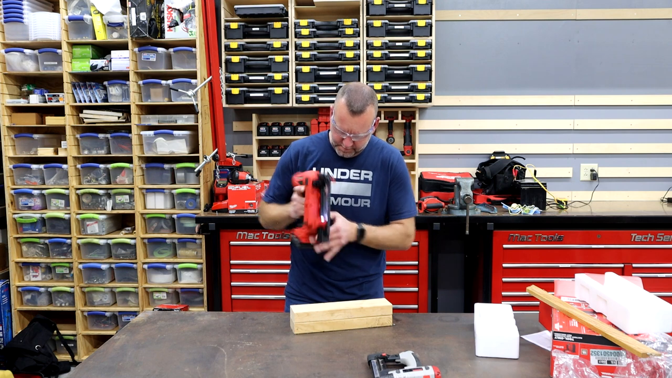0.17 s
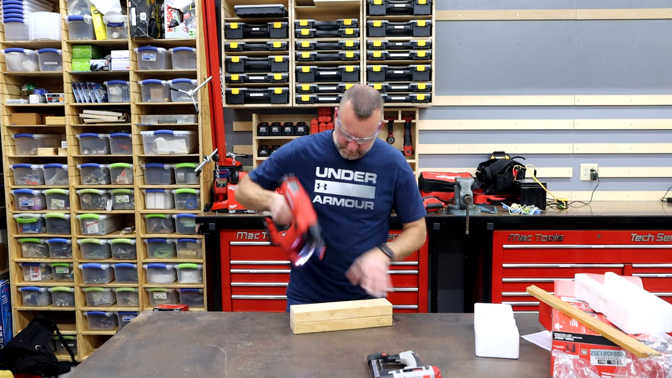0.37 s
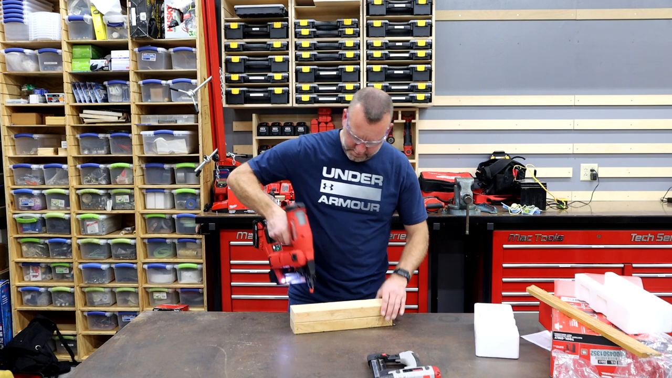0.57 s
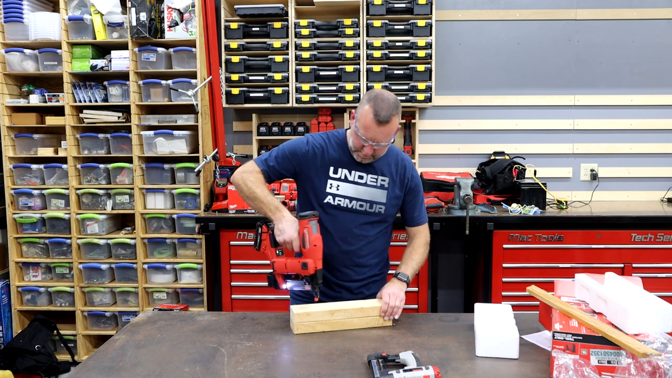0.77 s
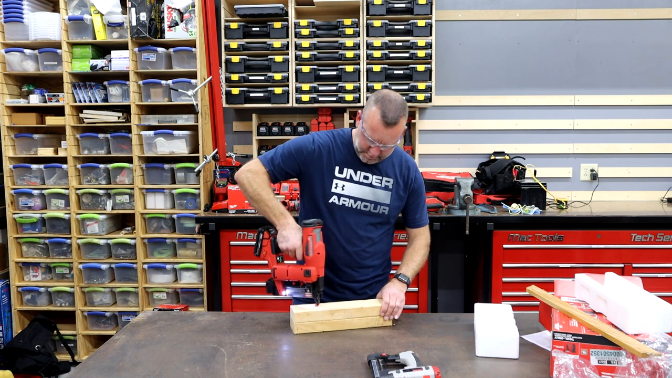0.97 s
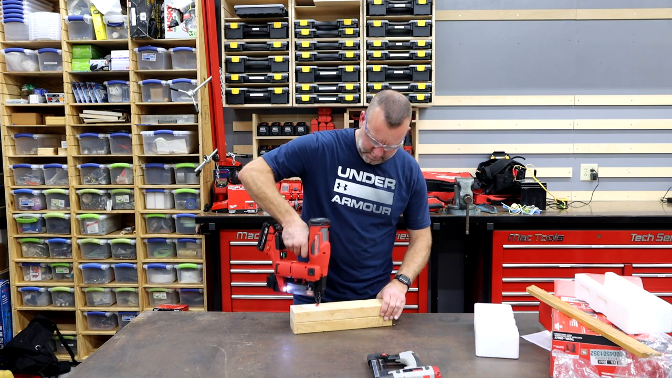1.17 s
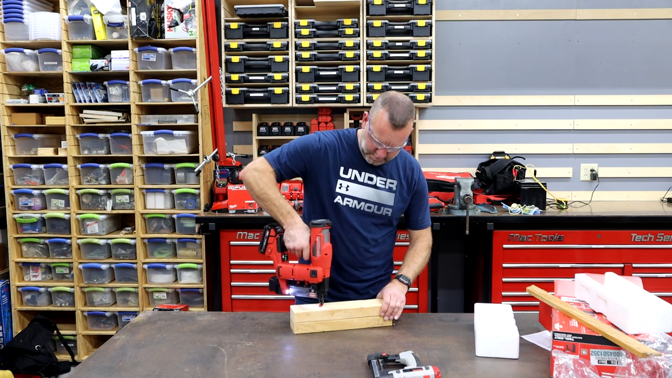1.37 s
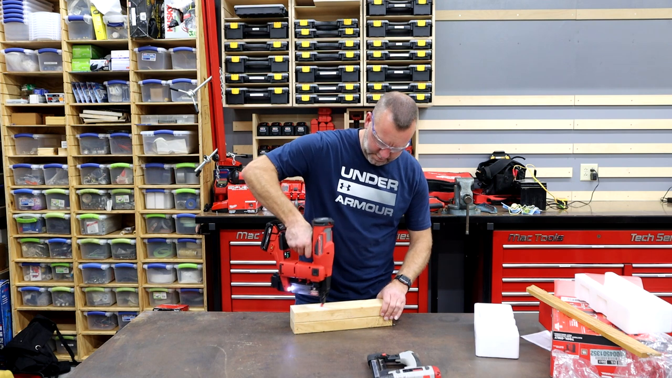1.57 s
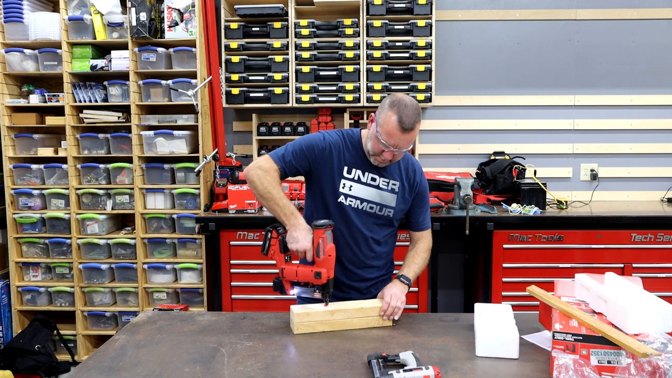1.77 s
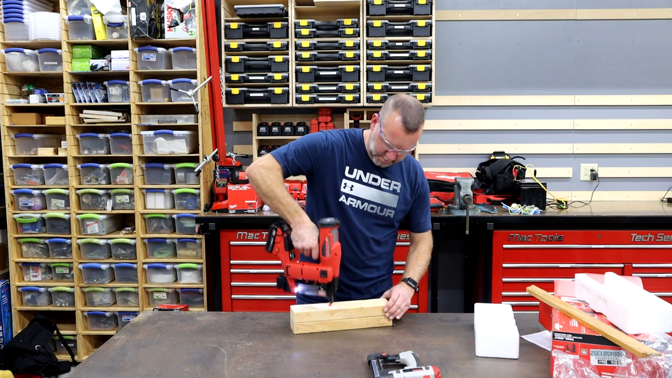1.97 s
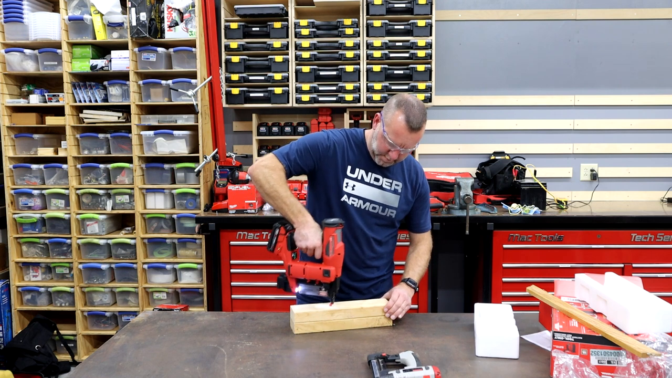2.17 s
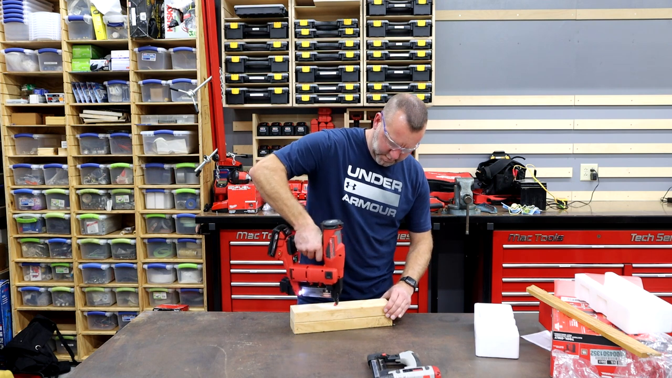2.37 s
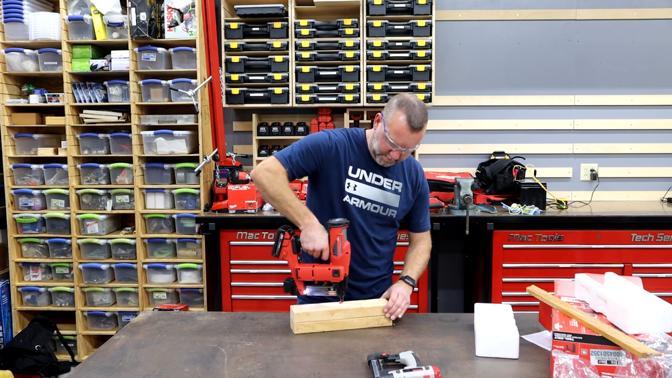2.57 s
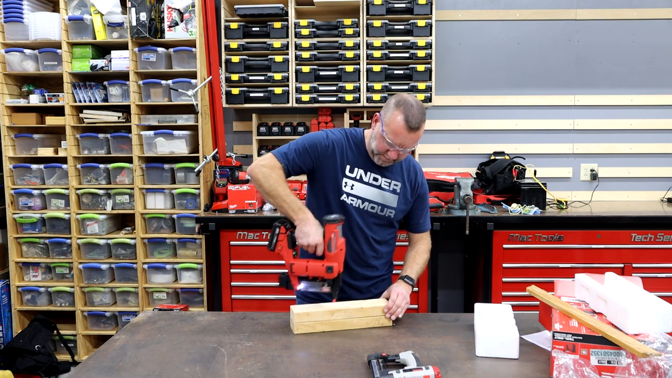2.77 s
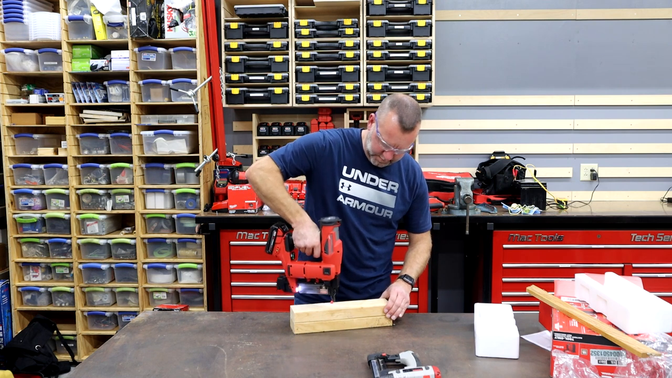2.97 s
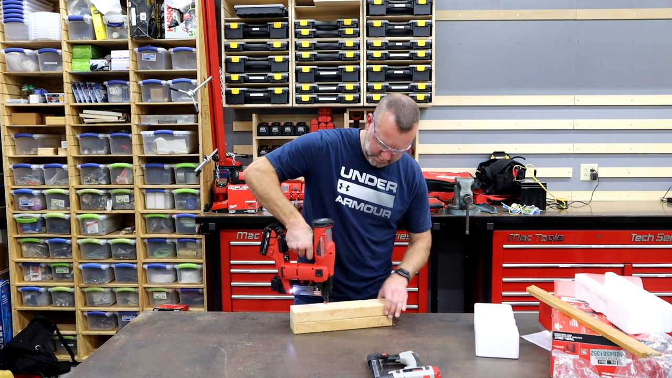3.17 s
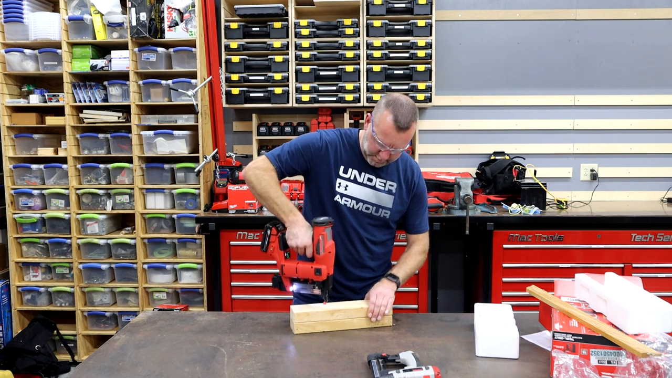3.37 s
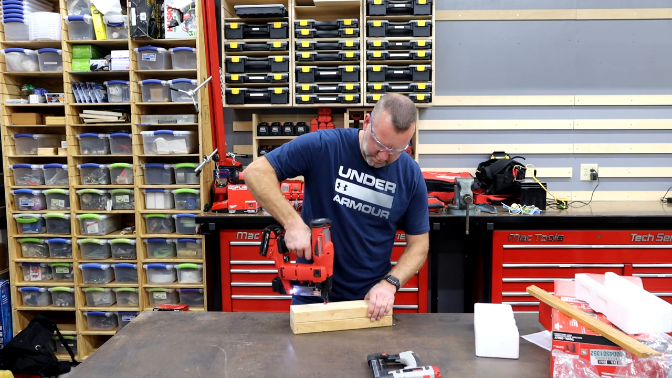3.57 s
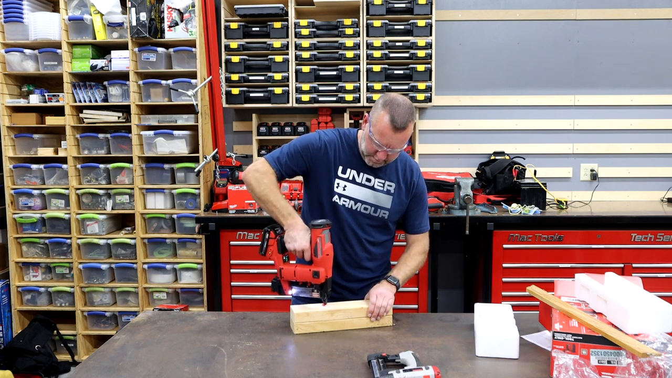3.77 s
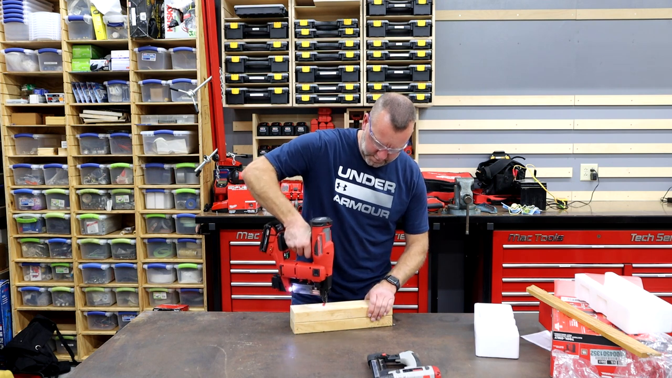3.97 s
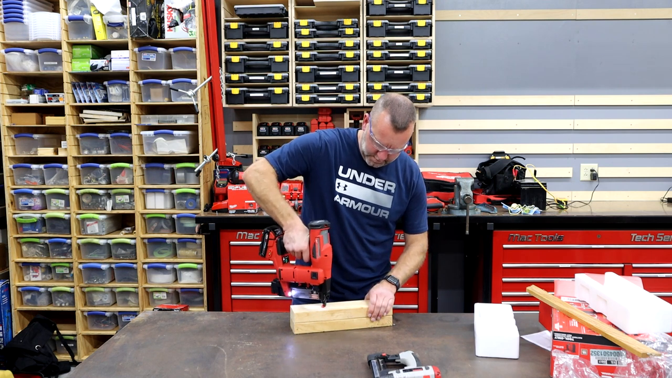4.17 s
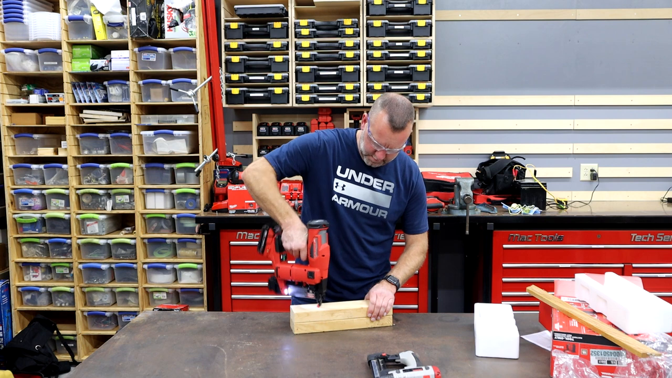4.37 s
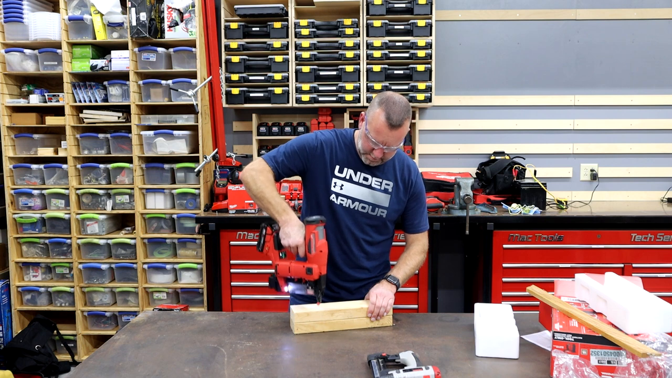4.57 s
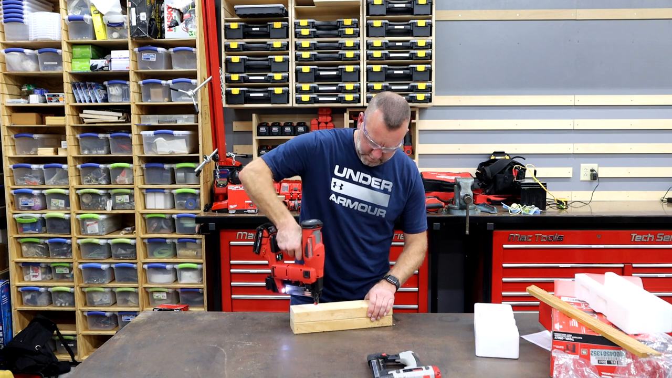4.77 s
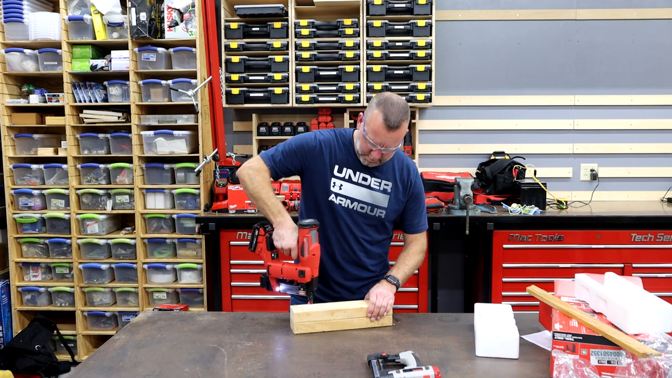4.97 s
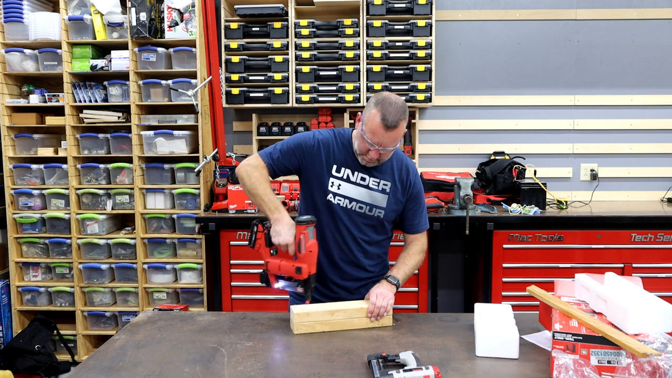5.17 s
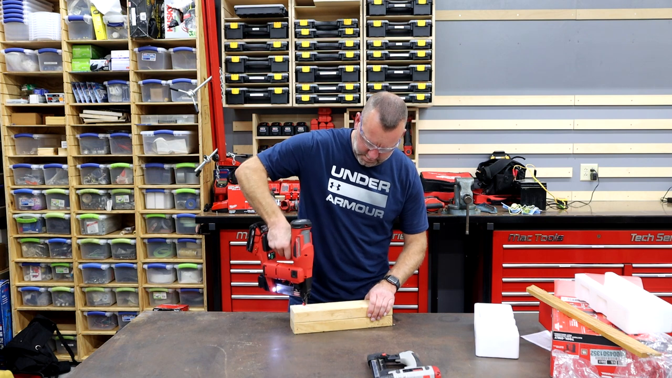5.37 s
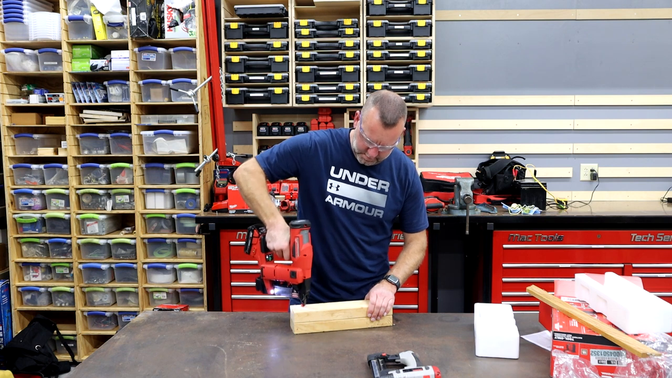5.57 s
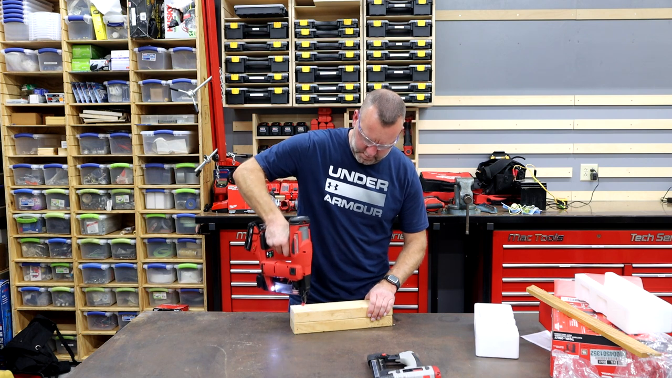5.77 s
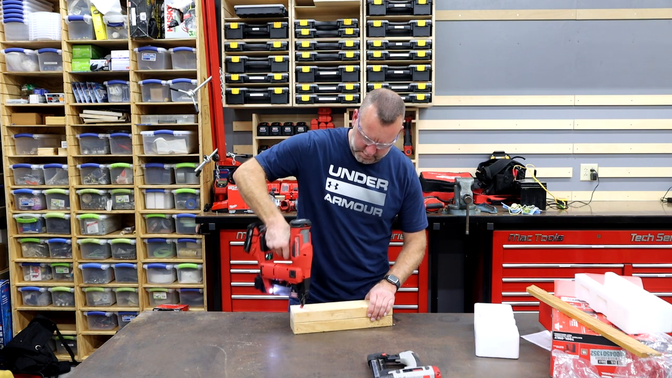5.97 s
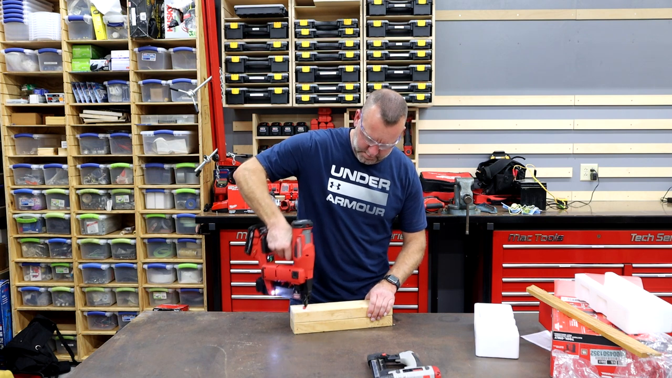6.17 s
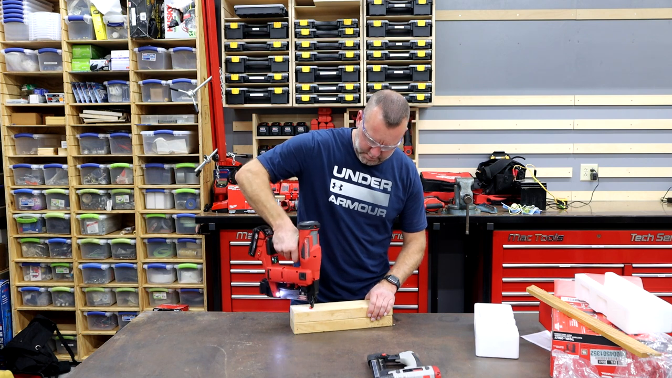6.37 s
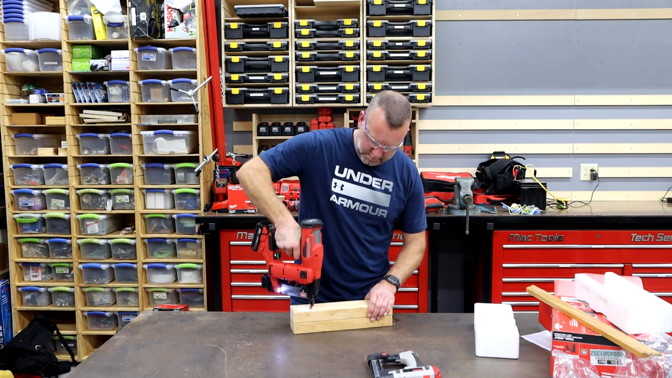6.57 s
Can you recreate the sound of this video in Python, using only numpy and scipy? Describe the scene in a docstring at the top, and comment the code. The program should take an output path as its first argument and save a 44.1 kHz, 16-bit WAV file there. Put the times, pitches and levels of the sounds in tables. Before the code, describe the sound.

After a few faint handling clicks and a bump of the tip on wood, a cordless nail gun drives eighteen nails into a board. Each shot is a sharp crack with a woody thump, followed by a brief gear whine, a bright metallic snap and the hiss of the motor running down. The shots quickly settle to about three a second. It sounds fairly close, in a quiet workshop with a short echo.

```python
"""Cordless brad nailer on a workbench

After a few handling clicks, eighteen nails go into a board in a workshop. Each time the tip clicks, the
motor spins up, the driver slams the nail home, the gears whine as they wind the piston back, a latch
snaps and the motor runs down. An automatic gain control turns the level down under the blows."""
import sys
import numpy as np
from scipy import signal
from scipy.fft import rfft, irfft
from scipy.io import wavfile
from scipy.ndimage import uniform_filter1d

SR = 44100
rng = np.random.default_rng(int(sys.argv[2]) if len(sys.argv) > 2 else 0)


def int16_out(signal):
    """Quantize to a 16-bit WAV file."""
    q = np.round(np.clip(np.atleast_2d(signal).T, -1, 1) * 32767)
    wavfile.write(sys.argv[1], SR, q.astype(np.int16))


N = 291501

# A "colour" says how strong each pitch is. A "fade time" is how long a sound takes to drop 60 dB.
# colours of the still air and the room's echo: (frequency [Hz], level [dB])
AIR_COLOUR = [(15, -48.5), (25, -6), (58, -17), (92, -9.5), (111, -13), (309, -16), (363, -7), (394, -20),
              (476, -8.5), (516, -19), (591, -19.5), (11900, -32), (16000, -36)]
ECHO_COLOUR = [(60, -6), (220, -12.5), (400, -8.5), (800, -11), (2500, -8.5), (7000, -12), (14000, -10)]
# how long the room echoes: (frequency [Hz], fade time [s])
ECHO_FADE = [(100, .2), (250, .27), (500, .33), (2000, .34), (6000, .3), (15000, .22)]
# hand and tip rubbing on tool and board: (time [s], length [s], level [dB])
RUBS = [(0.246, 0.042, -89), (0.632, 0.046, -69), (1.007, 0.026, -46)]
# clicks of grip and trigger, and bumps of the nose on the board: (time [s], level [dB])
GRIP_CLICKS = [(0.2265, -74.5), (.2702, -74), (.574, -79), (0.6236, -54), (0.6336, -66), (.6555, -53.5)]
NOSE_BUMPS = [(.998, -35.5), (1.3027, -27)]
# colours of the handling and the nose bumps: (frequency [Hz], level [dB])
HANDLING_COLOUR = [(100, -22), (450, -11), (800, -1.5), (1400, 6), (2800, 7), (4300, -1), (6500, -10),
                   (8800, -5.5), (11500, -20), (16000, -20)]
NOSE_COLOUR = [(150, -18), (700, 7.5), (1700, 2), (3200, 6), (6000, -2), (8700, 0), (10500, -11),
               (12800, -3), (16000, -17)]
# gears knocking, and the lifter's pins meeting the driver: (time after the blow [s], level [dB])
GEAR_TICKS = [(0.014, -36), (0.133, -23.5), (0.1403, -27)]
PIN_TICKS = [(0.0682, -32.5), (0.0817, -35.5), (0.0993, -38), (.183, -34), (.2025, -34), (0.2238, -36.5)]
# colours of the tip click, slack knock, small ticks and pins: (frequency [Hz], level [dB])
TIP_COLOUR = [(100, -15), (700, -1), (2200, -9.5), (3600, 5), (5200, 1), (6800, -12), (8400, 3.5),
              (10000, -11), (16000, -13.5)]
SLACK_COLOUR = [(100, -22), (450, 1), (750, 13), (1400, 4.5), (3000, 12.5), (5500, 11), (9000, -6.5),
                (12000, -20), (16000, -4)]
TICK_COLOUR = [(200, -35), (1000, -5.5), (2500, -0.5), (4500, 3), (6200, 7), (8400, 0), (10000, -2),
               (13000, -18.5), (16000, -27)]
PIN_COLOUR = [(300, -15), (3000, -6), (6500, -3), (8400, 7), (9800, 0), (11000, -10), (13000, 0.5),
              (16000, -14.5)]
# two strokes wind the piston back:
# (time after the blow [s], length [s], speed the shaft sags towards [Hz], sag time [s])
STROKES = [(.025, .094, 348, .045), (.154, .073, 318, .037)]
# tones of the meshing gears: (multiple of the shaft speed, level [dB])
GEAR_TONES = [(2, -22), (5, 4), (6, 2.5), (9, -3.5), (10, 1.5), (12, 0), (15, 5), (20, -3.5), (25, -3)]
# colour of the gear hiss, and how well the case gives off the tones: (frequency [Hz], level [dB])
HISS_COLOUR = [(60, -38), (150, -16), (330, -6), (480, -2), (780, 3), (1100, 0), (2000, 1.5), (3400, -1),
               (5200, 1), (7000, -1.5), (8800, -5), (10200, -13.5), (13000, -18), (16000, -58)]
WHINE_COLOUR = [(600, -24), (1750, -3.5), (2200, -12), (3000, -1), (3900, 4.5), (4600, -8.5), (5700, 2),
                (6600, -2), (7400, 10), (8200, 0.5), (9500, -1.5), (12000, -22)]
# ringing of the gear case: (frequency [Hz], sharpness [Q], level [dB])
CASE_RINGS = [(2710, 40, -10), (2980, 16, -19), (3495, 41, -3)]
# ringing of the housing under the latch, and of board, bench and tool under the blow:
# (frequency [Hz], level against the hit [dB], fade time [s])
HOUSING_RINGS = [(244, -20, 0.04), (550, -1.5, 0.013), (808, 0.5, 0.026), (810, -27, 0.074)]
BOARD_RINGS = [(152, -15.5, 0.06), (207, -10, 0.055), (263, -8.5, 0.073), (325, -11, 0.046),
               (443.5, -8, 0.034), (536, -9, 0.057), (724, -7, 0.044), (913, -10.5, 0.041),
               (1107, -14.5, 0.047), (1251, -11, 0.043), (1453, -14, 0.054), (1498, -14.5, 0.051)]
# colours of the latch and the blow: (frequency [Hz], level [dB])
LATCH_COLOUR = [(60, -68.5), (500, 2.5), (1200, -18.5), (2000, -9.5), (2800, 5), (3800, 0), (5000, 4.5),
                (6400, -7), (7500, -1), (8900, 5), (10000, -11), (11800, -9.5), (14000, -8), (16000, -22.5)]
BLOW_COLOUR = [(40, -86), (150, -16), (400, 2), (1000, 2.5), (1600, 1.5), (3000, 3), (4500, 1),
               (6500, -7.5), (8200, 1), (9800, -10.5), (12500, -15), (16000, -15.5)]
# one row for each nail: (time of the blow [s], blow level [dB], latch level [dB], tip level [dB])
SHOTS = [(1.0661, -8.5, -12, -26), (1.4878, -8, -11.5, -22.5), (1.8446, -8.5, -13, -23.5),
         (2.1596, -10, -10.5, -23.5), (2.4545, -7.5, -7.5, -26.5), (2.7493, -6.5, -4.5, -26.5),
         (3.045, -11, -10.5, -27.5), (3.3404, -9, -10.5, -25), (3.636, -8.5, -11.5, -26.5),
         (3.9317, -9.5, -9.5, -29), (4.2366, -9.5, -12, -31), (4.5412, -10, -12, -31),
         (4.8377, -8.5, -12, -34), (5.1340, -8.5, -11, -38), (5.4296, -8.5, -11.5, -45),
         (5.7251, -8.5, -11.5, -39), (6.0215, -10.5, -11.5, -42), (6.3180, -9.5, -11, -46)]

# the push of each kind of contact: (rise time [s], hold time [s], fade time [s])
KNOCK_FORCE, CLICK_FORCE = (.0005, .00074, .015), (.00033, .0005, .02)
LATCH_FORCE, BLOW_FORCE = (.00037, .0015, .012), (.0007, .00025, .023)
SHUDDER_FORCE = (.002, .002, .097)
# when the tip clicks, the motor starts, the latch snaps and the power stops, counted from the blow
TIP_BEFORE_S, START_BEFORE_S, LATCH_AFTER_S, STOP_AFTER_S = .0395, .025, .1201, .226
MOTOR_DB = -37.5  # gear hiss with no load; whine and rasp are set against it


def from_db(db):
    """Turn decibels into a gain."""
    return 10 ** (np.asarray(db) / 20)


def rms_one(x):
    """Scale a signal to an average power of 1."""
    return x / np.sqrt(np.mean(x ** 2) + 1e-20)


def at_hz(points, hz):
    """Look up a frequency in a table, with octaves evenly spaced."""
    f, value = np.transpose(points)
    return np.interp(np.log(np.maximum(hz, 1)), np.log(f), value)


def add(out, s, sound):
    """Mix a sound in, starting at s seconds."""
    start = int(round(s * SR))
    part = sound[:max(len(out) - start, 0)]
    out[start:start + len(part)] += part


def envelope(t, rise_s, hold_s, fade_s):
    """Rise to full strength at t = 0, hold, then die away."""
    return np.clip(1 + t / rise_s, 0, 1) * np.exp(-np.log(1000) * np.maximum(t - hold_s, 0) / fade_s)


def drift(rate_hz):
    """A random wander, mostly slower than rate_hz, with a typical size of 1."""
    smooth = signal.butter(2, rate_hz, fs=SR, output="sos")
    return rms_one(signal.sosfilt(smooth, rng.standard_normal(N)))


def coloured(x, colour, size=4096):
    """Give a sound a colour; white noise keeps its power."""
    gains = rms_one(from_db(at_hz(colour, np.fft.rfftfreq(size, 1 / SR))))
    # build the filter so that it rings only after a hit, never before (minimum phase)
    cepstrum = irfft(np.log(gains))
    cepstrum[1:size // 2] *= 2
    cepstrum[size // 2 + 1:] = 0
    return signal.oaconvolve(x, irfft(np.exp(rfft(cepstrum))))[:N]


def clatter(times, levels_db, force, colour, alike=0.26):
    """Each hit is a short burst of metal chatter; `alike` is the share that all hits have in common."""
    common, *own = rng.standard_normal(size=(len(times) + 1, 4096))
    t = np.arange(len(common)) / SR - force[0]
    out, push = np.zeros(N), envelope(t, *force)
    for s, db, noise in zip(times, levels_db, own):
        chatter = np.sqrt(alike) * common + np.sqrt(1 - alike) * noise
        add(out, s + t[0], from_db(db) * push * chatter)
    return coloured(out, colour)


def struck(times, levels_db, rings, vary_db, detune=.012):
    """A struck part rings at its own pitches, a little differently as the point of contact moves."""
    out, t = np.zeros(N), np.arange(SR // 5) / SR
    hz, ring_db, fade_s = np.transpose(rings)[:, :, None]
    signs = (-1) ** np.arange(len(rings))[:, None]
    for s, db in zip(times, levels_db):
        strength, shift = rng.standard_normal((2, len(rings), 1))
        gains = from_db(db + ring_db + vary_db * strength - 60 * t / fade_s)
        tones = np.sin(2 * np.pi * hz * (1 + detune * shift) * t)
        add(out, s, np.sum(signs * gains * tones, axis=0))
    return out


def still_air(level_db=-88):
    """The quiet room has a faint, steady rumble and hiss."""
    return from_db(level_db) * coloured(rng.standard_normal(N), AIR_COLOUR)


def workshop(x, first_echo_s=0.0096):
    """Cluttered shelves scatter the sound into a short, dense echo that lasts longest in the middle range."""
    t = np.arange(SR // 2) / SR
    edges = np.geomspace(40, 18000, num=13)
    white, tail = rng.standard_normal((2, len(t))), 0
    for k, (low, high) in enumerate(zip(edges, edges[1:])):
        hz = np.sqrt(low * high)
        fade = np.exp(-np.log(1000) * t / at_hz(ECHO_FADE, hz)) * (t > first_echo_s)
        band = signal.sosfilt(signal.butter(2, [low, high], "band", fs=SR, output="sos"), white[k % 2])
        band_share = np.sqrt(2 * (high - low) / SR / len(t))
        tail = tail + from_db(at_hz(ECHO_COLOUR, hz)) * rms_one(band * fade) * band_share
    return x + signal.oaconvolve(x, tail)[:N]


def handling(grain_db=4):
    """The grip clicks, the nose bumps the board, and hand and tip rub with a grainy sound."""
    t = np.arange(N) / SR
    pressure = sum(from_db(db) * envelope(t - s, .004, length_s, fade_s=.09) for s, length_s, db in RUBS)
    rub = pressure * rms_one(rng.standard_normal(N) * from_db(grain_db * drift(400)))
    grip = clatter(*np.transpose(GRIP_CLICKS), KNOCK_FORCE, HANDLING_COLOUR, alike=0.074)
    nose = clatter(*np.transpose(NOSE_BUMPS), KNOCK_FORCE, NOSE_COLOUR)
    return coloured(rub, HANDLING_COLOUR) + grip + nose


def rattle(times, rattle_db=-42, spread_db=4, count=14):
    """Loose nails and springs rattle at random while the motor runs."""
    when = times[:, None] + rng.uniform(0, STOP_AFTER_S, (len(times), count))
    levels_db = rattle_db + spread_db * np.clip(rng.standard_normal(when.shape), -2, 2)
    return clatter(when.ravel(), levels_db.ravel(), CLICK_FORCE, TICK_COLOUR, alike=0.07)


def ticks(times, pattern, colour, vary_s=.0005, vary_db=2):
    """Small parts touch in a pattern that repeats for every nail, never quite the same."""
    after, tick_db = np.transpose(pattern)
    late, louder = rng.standard_normal((2, len(times), len(after)))
    when = times[:, None] + after + vary_s * late
    levels_db = tick_db + vary_db * louder
    return clatter(when.ravel(), levels_db.ravel(), KNOCK_FORCE, colour)


def clicks(times, tip_db, slack_db=-29):
    """The safety tip clicks, the gears take up their slack with a knock, then gears and pins tick."""
    tip = clatter(times - TIP_BEFORE_S, tip_db, CLICK_FORCE, TIP_COLOUR)
    slack = clatter(times - START_BEFORE_S, np.full(len(times), slack_db), CLICK_FORCE, SLACK_COLOUR)
    return tip + slack + ticks(times, GEAR_TICKS, TICK_COLOUR) + ticks(times, PIN_TICKS, PIN_COLOUR)


def gear_case(times, hiss_level, running_db=-10, rasp_db=4.5, rise_s=.011):
    """The case rings at the same pitches whatever the speed, and rasps hardest as the motor starts."""
    t = np.arange(SR // 10) / SR - rise_s
    rasp = from_db(MOTOR_DB + rasp_db) * envelope(t, rise_s, hold_s=.0071, fade_s=.025)
    shaking = from_db(running_db) * hiss_level
    for s in times - START_BEFORE_S:
        add(shaking, s, rasp)
    ringing = 0
    for hz, q, db in CASE_RINGS:
        ring = signal.lfilter(*signal.iirpeak(hz, q, fs=SR), rng.standard_normal(N))
        ringing = ringing + from_db(db) * rms_one(ring)
    return shaking * ringing


def winding(t, start_hz=310, free_hz=440, stroke_whine_db=(-10, -7), rise_s=.028):
    """The shaft spins up; each stroke then drags it down and swells the whine as the teeth take load."""
    shaft_hz = np.interp(t, [-START_BEFORE_S, STROKES[0][0]], [start_hz, free_hz])
    load, whining = 0, 0
    for (start_s, length_s, loaded_hz, sag_s), whine_db in zip(STROKES, stroke_whine_db):
        since = np.maximum(t - start_s, 0)
        held = envelope(t - start_s - rise_s, rise_s, length_s - rise_s, fade_s=.05)
        squeeze = 1 - np.exp(-since / sag_s)
        shaft_hz = np.where(since > 0, free_hz + (loaded_hz - free_hz) * squeeze, shaft_hz)
        load = load + held
        whining = whining + from_db(whine_db) * held
    return shaft_hz, load, whining


def motor(times, rise_s=.006, load_db=1, coast_db=-2, free_whine_db=-12, waver_db=3, grain_db=2):
    """Gears hiss and whine as they wind the piston back, then hiss on as they coast without power."""
    t = np.arange(SR // 2) / SR - START_BEFORE_S - rise_s
    shaft_hz, load, whining = winding(t)
    powered = envelope(t + START_BEFORE_S, rise_s, START_BEFORE_S + STOP_AFTER_S, fade_s=.074)
    coasting = from_db(coast_db) * envelope(t - STOP_AFTER_S, rise_s, hold_s=0, fade_s=1.54)
    hiss_shape = from_db(MOTOR_DB + load_db * load) * np.maximum(powered, coasting)
    whine_shape = from_db(MOTOR_DB) * np.maximum(whining, from_db(free_whine_db) * powered)
    hiss_level, whine = np.zeros(N), np.zeros(N)
    wobble, waver = drift(290), drift(110)
    for s in times:
        add(hiss_level, s + t[0], hiss_shape)
        offsets = rng.integers(0, N - SR, len(GEAR_TONES) + 1)
        # a rested battery makes the first shots whine a little faster and louder
        rested = np.exp(-(s - times[0]))
        speed_hz = shaft_hz * (1 + .03 * rested + .0044 * wobble[offsets[-1]:][:len(t)])
        angle = 2 * np.pi * np.cumsum(speed_hz) / SR
        for (multiple, tone_db), offset in zip(GEAR_TONES, offsets):
            level_db = tone_db + .5 * rested + at_hz(WHINE_COLOUR, multiple * speed_hz)
            level_db += waver_db * waver[offset:][:len(t)]
            tone = np.sqrt(2) * np.sin(multiple * angle + offset)
            add(whine, s + t[0], whine_shape * from_db(level_db) * tone)
    # teeth meet unevenly, so the hiss is grainy
    teeth = rms_one(rng.standard_normal(N) * from_db(grain_db * drift(780)))
    return coloured(teeth * hiss_level, HISS_COLOUR) + whine + gear_case(times, hiss_level)


def latches(times, levels_db):
    """The steel latch snaps brightly, with a hollow knock from the plastic housing."""
    snap = clatter(times, levels_db, LATCH_FORCE, LATCH_COLOUR, alike=0.67)
    return snap + struck(times - .0003, levels_db, HOUSING_RINGS, vary_db=.5)


def blows(times, levels_db, slide_before_s=.0045, thump_before_s=.002726, slide_db=-13, shudder_db=-18):
    """The driver slides down its guide, thumps the board and cracks the nail home; the tool shudders."""
    slide = clatter(times - slide_before_s, levels_db + slide_db, BLOW_FORCE, BLOW_COLOUR)
    crack = clatter(times, levels_db, BLOW_FORCE, BLOW_COLOUR, alike=0.38)
    shudder = clatter(times, levels_db + shudder_db, SHUDDER_FORCE, BLOW_COLOUR)
    thump = struck(times - thump_before_s, levels_db, BOARD_RINGS, vary_db=1.5)
    return slide + crack + shudder + thump


def scene(low_cut_hz=100):
    """The nailer and its handling in the room, over still air."""
    times, blow_db, latch_db, tip_db = np.transpose(SHOTS)
    hits = blows(times, blow_db) + latches(times + LATCH_AFTER_S, latch_db) + clicks(times, tip_db)
    running = motor(times) + rattle(times)
    # tool and board are too small to give off deep bass
    low_cut = signal.butter(2, low_cut_hz, "high", fs=SR, output="sos")
    nailer = signal.sosfilt(low_cut, hits + running + handling())
    return (still_air() + workshop(nailer))[None]


def excess_db(x, limit_db, release_db_per_s):
    """How far the peaks stand over a limit, falling back at a steady rate after each one."""
    ramp = release_db_per_s * np.arange(N) / SR
    over = np.maximum(20 * np.log10(np.abs(x) + 1e-9) - limit_db, 0)
    return np.maximum.accumulate(over + ramp) - ramp


def record(dry, boost_db=19, back_off_db_per_s=9, lopsided=0.36, ceiling=0.85, cutoff_hz=15900):
    """A slow gain control backs off at loud blows, a fast limiter ducks peaks, the top treble is cut."""
    too_loud = excess_db(dry[0], limit_db=-16, release_db_per_s=100) > 0
    cut_db = back_off_db_per_s * np.cumsum(too_loud) / SR
    x = dry[0] * from_db(np.maximum(boost_db - cut_db, 0))
    # the input squashes one side of an overload, which adds a deep thump
    x = x - lopsided * np.maximum(x - 1, 0)
    duck_db = uniform_filter1d(excess_db(x, limit_db=0, release_db_per_s=132), size=32)
    x = x * from_db(-duck_db)
    # peaks that slip past the limiter are rounded off
    x = x / (1 + (x / ceiling) ** 6) ** (1 / 6)
    return signal.sosfilt(signal.ellip(12, .1, 80, cutoff_hz, fs=SR, output="sos"), x)[None]


dry = scene()
out = record(dry)
int16_out(out)
```